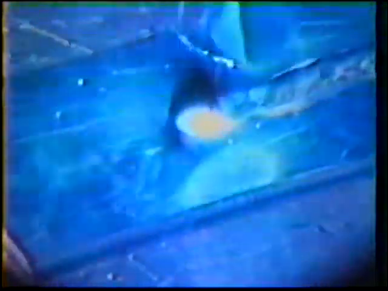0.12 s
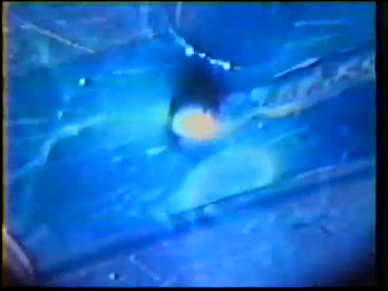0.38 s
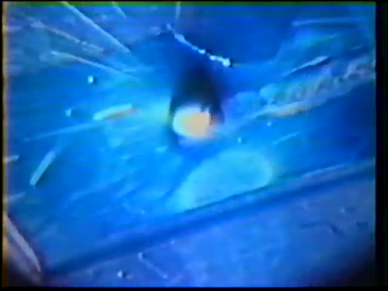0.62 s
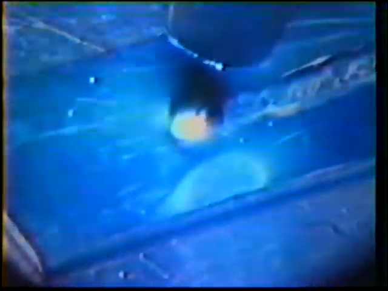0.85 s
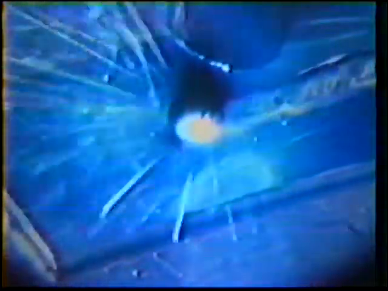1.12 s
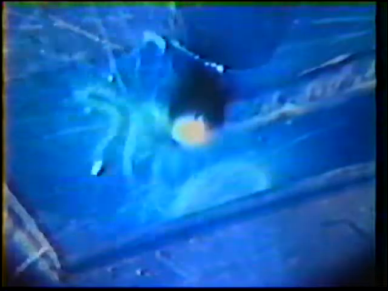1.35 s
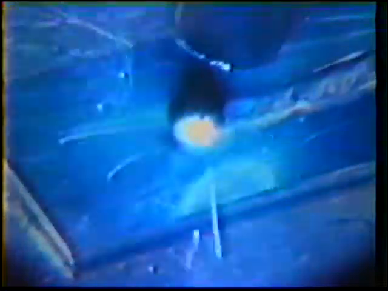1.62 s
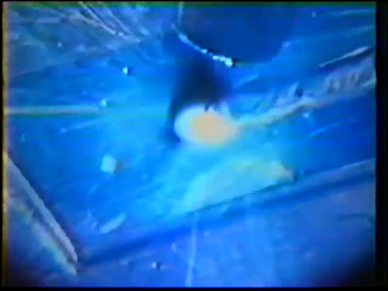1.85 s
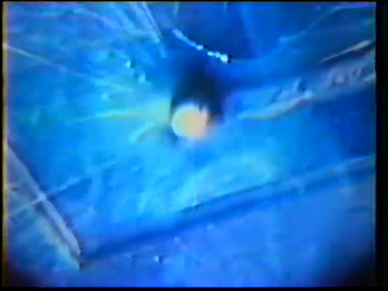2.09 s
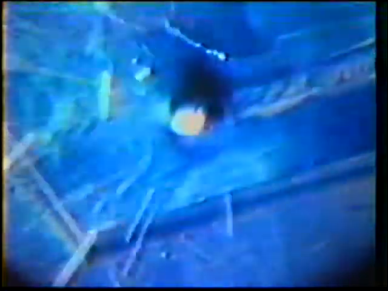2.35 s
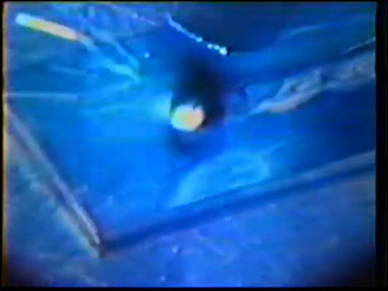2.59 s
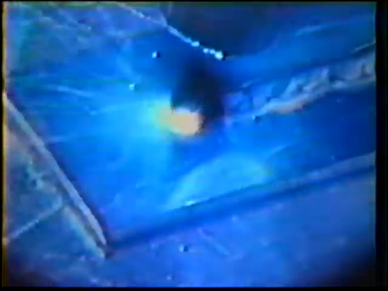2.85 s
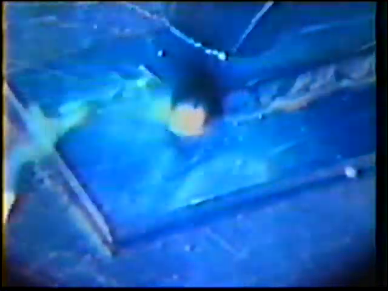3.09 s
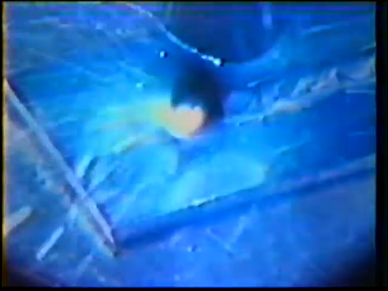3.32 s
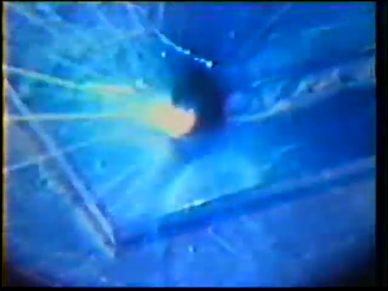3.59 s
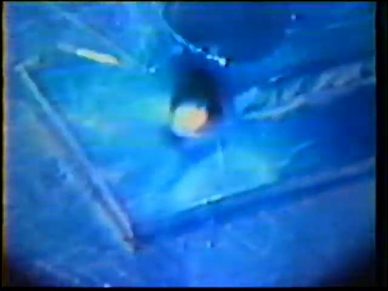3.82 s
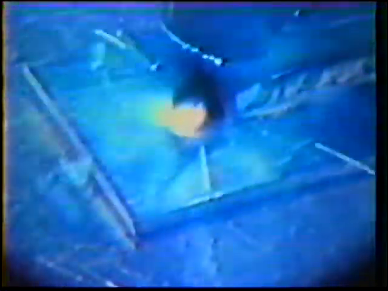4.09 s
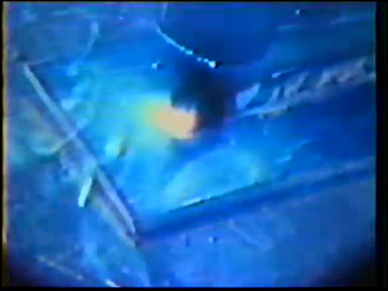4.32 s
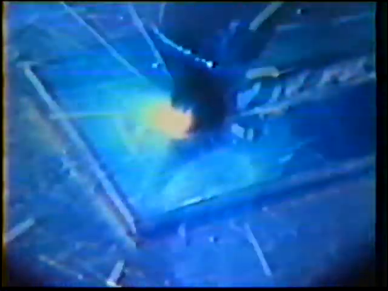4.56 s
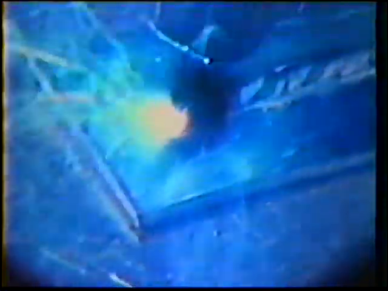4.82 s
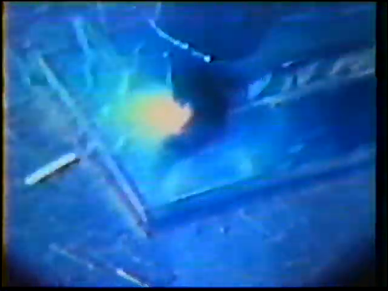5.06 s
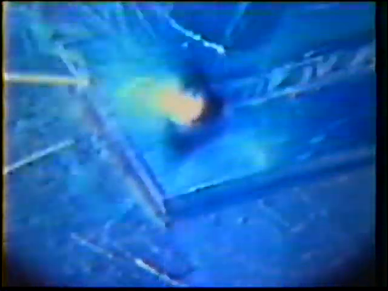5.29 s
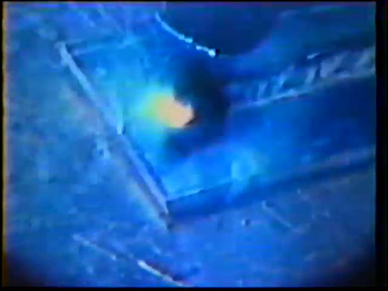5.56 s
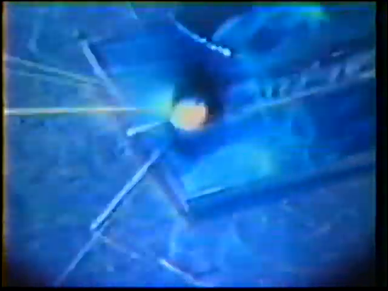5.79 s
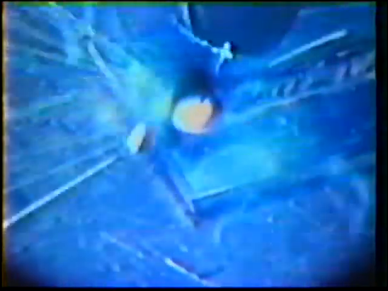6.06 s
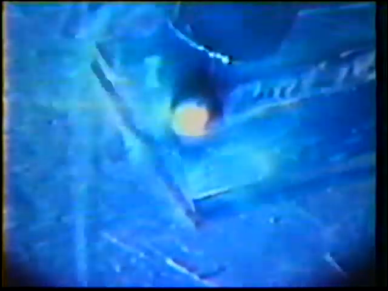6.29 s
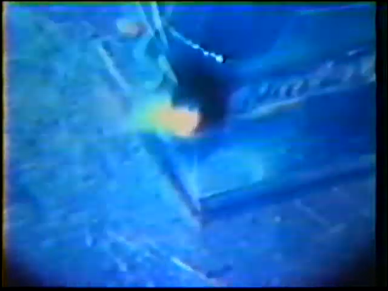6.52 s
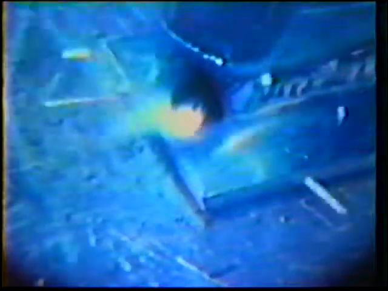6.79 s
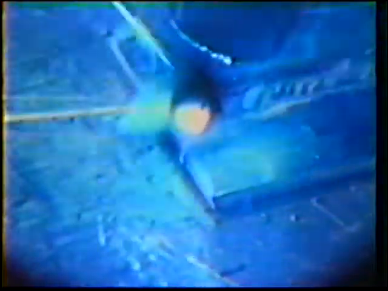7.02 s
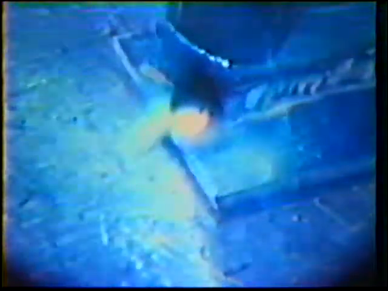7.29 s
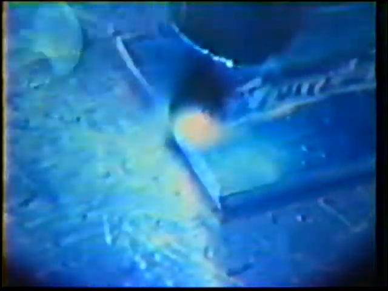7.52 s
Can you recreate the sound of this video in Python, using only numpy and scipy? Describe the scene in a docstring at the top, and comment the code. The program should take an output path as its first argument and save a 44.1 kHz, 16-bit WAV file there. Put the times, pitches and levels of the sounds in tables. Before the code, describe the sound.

From 0 s a welding arc is already burning on aluminium sheet, a loud, bright, frying hiss that flickers rapidly, ringing mostly in a metallic band around 3 to 6 kHz. Short-circuiting drops pop some forty times a second, slightly unevenly, with fine random crackle between them. Stronger snaps stand out near 0.45 s. From about 2.2 to 4.5 s the torch is close: the pops sound fuller and tiny beads tick more thickly on the sheet. It then draws back to a brighter sizzle, with a strong pop near 5.2 s. From 6.5 s the leaning torch changes the tone again. At about 7.4 s the arc starves, sputters and is out by 7.6 s, leaving a brief hard-room tail. Beneath throughout are a faint, steady motor hum near 354 Hz with its octave, low rumble and drones, and soft tape hiss. The close sound has slightly rounded peaks and little stereo width.

```python
"""A welding arc already burns on aluminium sheet in a hard-walled workshop, its noise ringing in nozzle and sheet.
Wire drops short and pop all along; from about 2.2 s to 4.5 s the torch works mostly close, and beads tick thicker.
The torch then draws back, leans over from 6.5 s, and at 7.4 s the trigger is let go: the arc starves and goes out.
A motor hum, rumble and drones lie beneath throughout.
One microphone feeds two slightly skewed tape tracks that round the peaks and hiss."""
import sys
import numpy as np
from scipy import signal
from scipy.fft import rfft, irfft, next_fast_len
from scipy.io import wavfile

SR = 44100
rng = np.random.default_rng(int(sys.argv[2]) if len(sys.argv) > 2 else 0)


def inscribe(sig):
    """Save sig as 16-bit PCM at rate SR to the path in sys.argv[1].

    A 1-D sig is mono; a 2-D sig holds one channel per row.
    Samples are clipped to [-1, 1] before scaling.
    """
    pcm = np.round(np.clip(np.atleast_2d(sig).T, -1, 1) * 32767)
    wavfile.write(sys.argv[1], SR, pcm.astype(np.int16))


def gain_from_db(level_db):
    """Turn a decibel level (scalar or array-like) into a linear amplitude factor."""
    decades = np.asarray(level_db, float) / 20
    return 10 ** decades


N = 337365


def rms_one(x):
    """Scale to rms 1."""
    return x / np.sqrt(np.mean(x ** 2) + 1e-20)


def in_time(rows):
    """Columns of a curve table, sample by sample."""
    s, *columns = np.transpose(rows)
    t = np.arange(N) / SR
    return [np.interp(t, s, column) for column in columns]


def at_hz(points, hz):
    """Columns of a spectrum table at the given frequency, on a log axis."""
    corner, *columns = np.transpose(points)
    return [np.interp(np.log(hz), np.log(corner), column) for column in columns]


def drift(rate_hz):
    """Slow chance of spread 1: noise through a double one-pole low-pass, run in for a second."""
    r = np.exp(-2 * np.pi * rate_hz / SR)
    noise = rng.standard_normal(N + SR)
    return rms_one(signal.lfilter([1], [1, -2 * r, r * r], noise)[SR:])


def resonate(x, hz, width_hz):
    """A resonance passed twice, so that the valleys beside it stay dark."""
    # each pass is wider, so that the pair has about the given width
    r = np.exp(-np.pi * 1.5 * width_hz / SR)
    gain = (1 - r * r) / 2
    section = [gain, 0, -gain, 1, -2 * r * np.cos(2 * np.pi * hz / SR), r * r]
    return signal.sosfilt([section, section], x)


def shaped(x, points):
    """Smooth colouring by a (hz, db) spectrum."""
    size = next_fast_len(N)
    hz = np.maximum(np.fft.rfftfreq(size, 1 / SR), 1)
    gain_db, = at_hz(points, hz)
    return irfft(rfft(x, size) * gain_from_db(gain_db), size)[..., :N]


def strikes_of(events):
    """One click per (start_s, strike_db) row."""
    start_s, strike_db = np.transpose(events)
    out = np.zeros(N)
    out[(start_s * SR).astype(int)] = gain_from_db(strike_db)
    return out


def puffs(strikes, decay_s, snap):
    """Each strike is a snap followed by a burst of noise that dies in a few milliseconds."""
    dying = signal.lfilter([1], [1, -np.exp(-1 / (decay_s * SR))], strikes + 1e-18)
    return dying * rng.standard_normal(N) + snap * strikes


# pose of the torch: start_s [s], closeness [0-1], lean [0-1]
TORCH_POSE = [(0, 0.55, 0.1), (.5, 0.03, 0.1), (1, 0, 0.2), (1.5, 0.37, 0.65), (2.05, 0.14, 0.77),
              (2.2, 0.88, 0.25), (2.8, 0.9, 0.25), (3.4, 0.91, 0.17), (4, 0.97, 0.13), (4.5, 0.52, 0),
              (5, 0.1, 0), (5.5, 0.02, 0.19), (6, 0, 0.35), (6.5, 0.14, 0.63), (7, 0.15, 0.96),
              (7.4, 0.34, 1), (7.65, 0.03, 0.5)]


def torch_pose():
    """How close and how leaning the torch is held, moving smoothly from pose to pose."""
    return in_time(TORCH_POSE)


# the trigger is let go: the arc starves, then goes out and leaves the cooling pool
STARVES_S, STARVES_DB_PER_S = 7.42, 79
OUT_S, OUT_DB_PER_S, EMBER_DB = 7.54, 300, -42
# strength of the sizzle as the hand travels, before the resonances: start_s [s], level_db [dB]
SIZZLE_LEVEL = [(0, -16.5), (.59, -14.5), (1.34, -15), (1.83, -17.5), (2.1, -16.5), (2.36, -16), (3, -18),
                (3.13, -16), (3.6, -17), (4.92, -15.5), (5.32, -14.5), (6.07, -15), (6.54, -17.5),
                (6.9, -18), (7.09, -14.5), (7.2, -18), (7.39, -21.5)]


def sizzle_db():
    """The travelling strength of the arc, starved and then put out at the end."""
    t = np.arange(N) / SR
    starving_db = STARVES_DB_PER_S * np.maximum(t - STARVES_S, 0)
    going_out_db = OUT_DB_PER_S * np.maximum(t - OUT_S, 0)
    level_db, = in_time(SIZZLE_LEVEL)
    return np.maximum(level_db - starving_db - going_out_db, EMBER_DB)


# further drops form at a fairly even pace, slower when the torch is close
DROP_EVERY_S, CLOSE_SLOWS_S, DROP_JITTER_S = .026, .007, .003
DROP_DB, DROP_SPREAD_DB = -23.5, 1.1
# drops shorting at set times, strong and weak: start_s [s], strike_db [dB before the resonances]
TIMED_DROPS = [(0.044, -17.5), (0.307, -25), (0.452, -15), (0.533, -22), (0.691, -17.5), (0.873, -23),
               (1.126, -30), (1.282, -21), (1.416, -25), (1.468, -23), (1.672, -24), (1.778, -25),
               (1.879, -21.5), (1.975, -24), (2.125, -22), (2.181, -18), (2.217, -23), (2.26, -18),
               (2.342, -20), (2.379, -23), (2.405, -20), (2.456, -21), (2.479, -20), (2.547, -18.5),
               (2.642, -19.5), (2.692, -25), (2.743, -17.5), (2.815, -20), (2.851, -20), (2.925, -19),
               (2.96, -20.5), (3.031, -21), (3.057, -18), (3.11, -20), (3.143, -18), (3.169, -20),
               (3.218, -18), (3.289, -19), (3.308, -17), (3.369, -20), (3.51, -26), (3.594, -22),
               (3.683, -21), (3.733, -19), (3.769, -17.5), (3.789, -19), (3.882, -22), (3.911, -22),
               (3.969, -20), (4.0, -19), (4.126, -23), (4.241, -24), (4.377, -18), (4.537, -23),
               (4.641, -22), (4.805, -19), (4.927, -18), (5.189, -13.5), (5.358, -21), (5.429, -19),
               (5.538, -21), (5.676, -24), (5.845, -23), (6.022, -20), (6.153, -22), (6.31, -22),
               (6.435, -18.5), (6.482, -22), (6.577, -22), (6.616, -19), (6.666, -22), (6.713, -23),
               (6.737, -22), (6.786, -20), (6.811, -18.5), (6.863, -22), (6.958, -22), (7.051, -21),
               (7.093, -18.5), (7.219, -19), (7.258, -20), (7.323, -19.5), (7.353, -20), (7.38, -23.5),
               (7.439, -21), (7.467, -33), (7.51, -31), (7.526, -26), (7.584, -33.5)]


def drops(close):
    """Drops at set times, with each wait between two shared evenly among further ones until the arc starves."""
    timed_s = np.transpose(TIMED_DROPS)[0]
    ends = timed_s[1:][timed_s[1:] < STARVES_S]
    even_s = []
    for start, end in zip(timed_s, ends):
        pace_s = DROP_EVERY_S + CLOSE_SLOWS_S * close[int(end * SR)]
        count = max(round((end - start) / pace_s), 1)
        even_s += list(np.linspace(start, end, count + 1)[1:-1])
    late, louder = rng.standard_normal((len(even_s), 2)).T
    further_s = np.array(even_s) + DROP_JITTER_S * late
    return list(TIMED_DROPS) + list(zip(further_s, DROP_DB + DROP_SPREAD_DB * louder))


SHORT_S, SHORT_DIP_DB = 0.0097, -2.5
LEAN_DIP_DB = -2   # the hiss sinks deeper when the torch leans


def burning_hiss(level, strikes, lean):
    """Noise that flickers with the arc length and sinks just before each pop, while a drop bridges the gap."""
    hiss = level * gain_from_db(1.43 * drift(38)) * rng.standard_normal(N)
    bridging = np.exp(-np.arange(SR // 20) / (SHORT_S * SR))
    # run backwards in time, so that the dip leads up to the strike
    reversed_strikes = 1. * (strikes[::-1] > 0)
    shorted = signal.fftconvolve(reversed_strikes, bridging)[:N][::-1]
    return hiss * gain_from_db((SHORT_DIP_DB + LEAN_DIP_DB * lean) * np.minimum(shorted, 1))


def sputter(level):
    """Small pops at random, about 150 a second, that follow the strength of the arc."""
    loudness_db = 3.5 * np.minimum(rng.exponential(1, N), 3)
    small = (rng.random(N) < 150 / SR) * gain_from_db(loudness_db)
    return level * rms_one(puffs(small, decay_s=0.0052, snap=3.2))


# resonances of nozzle, sheet and microphone: pitch_hz [Hz], width_hz [Hz], level_db [dB],
# close_db [dB more when close], lean_db [dB more when leaning]
RESONANCE_BANK = [(236, 160, -14.5, 1.5, 1.5), (443, 117, -8, 1.5, 3), (658, 300, -15.5, 2.5, 3.5),
                  (1014, 254, -14.5, 3.5, 3.5), (1386, 227, -7, 2, 0.5), (1647, 280, -10.5, 2, 3),
                  (2004, 710, -12.5, 1.5, -2.5), (2620, 370, -10, 2.5, 1), (3199, 236, 1, 5, -2),
                  (3608, 224, 1.5, 1, -3), (3830, 210, -1.5, 2.5, 1), (4057, 193, -0.5, 1, 0.5),
                  (4415, 200, -7, 0, -2), (4793, 224, -0.5, -1, 2.5), (5220, 206, 4.5, -3.5, -2),
                  (5403, 130, 3, -6, 2.5), (5563, 340, 1.5, 2, 0), (5924, 182, 6, -2.5, -1.5),
                  (6267, 210, -3.5, -3.5, 3.5), (6684, 336, -3, 3, 1.5), (6902, 575, -3.5, -4, 1.5),
                  (7890, 730, -14, 2.5, 3.5), (8415, 400, -9, -3, 4.5), (9240, 760, -11, -0.5, 3),
                  (10460, 590, -12.5, -2.5, 6), (11290, 780, -20, 1, 2), (12750, 1500, -24, -3, 1),
                  (13430, 260, -17.5, 0, 2.5), (14000, 410, -32, 1, 3)]
# how far pops stand out of the hiss: pitch_hz [Hz], pop_db [dB, drops], sputter_db [dB, small random pops]
POP_TINT = [(250, 15, -4), (600, 14.5, -5), (1390, 12, -5.5), (3400, 10, -7), (6000, -0.5, -8),
            (9000, 1, -9.5), (13000, -3, -12)]


def arc():
    """Hiss, small random pops and drop pops all ring the same resonances, rebalanced by the pose of the torch."""
    level = gain_from_db(sizzle_db())
    close, lean = torch_pose()
    small_pops = sputter(level)
    strikes = strikes_of(drops(close))
    pops = puffs(strikes, decay_s=0.0062, snap=6.4)
    hiss = burning_hiss(level, strikes, lean)
    out = 0
    for k, (hz, width_hz, db, close_db, lean_db) in enumerate(RESONANCE_BANK):
        pop_db, sputter_db = at_hz(POP_TINT, hz)
        source = hiss + gain_from_db(sputter_db) * small_pops + gain_from_db(pop_db) * pops
        gain = gain_from_db(db + close * close_db + lean * lean_db)
        # neighbouring resonances alternate in sign
        out = out + (-1) ** k * gain * resonate(source, hz, width_hz)
    return out


# further beads fall at random until the arc starves, mostly when the torch is close
BEADS_PER_S, CLOSE_BEADS_PER_S = 1.5, 5
BEAD_DB = -18.5
# beads hitting the sheet at set times: start_s [s], strike_db [dB before the band-pass]
TIMED_BEADS = [(0.0424, -19), (0.8594, -21), (1.6097, -17.5), (1.7774, -19), (2.1001, -20), (2.1304, -16.5),
               (2.2994, -17.5), (2.6694, -14), (2.9204, -17.5), (3.1194, -20), (3.7494, -14.5),
               (3.8794, -17.5), (4.425, -17.5), (4.784, -18), (5.4224, -19), (5.5974, -18), (6.5164, -18.5),
               (7.2594, -21), (7.3238, -14), (7.44, -18), (7.4884, -21.5), (7.529, -18), (7.5582, -28),
               (7.5864, -39)]


def spatter():
    """Molten beads tick on the sheet: very short bright bursts."""
    close, _ = torch_pose()
    burning = np.arange(N) < STARVES_S * SR
    chance = (BEADS_PER_S + CLOSE_BEADS_PER_S * close) / SR
    further = burning * (rng.random(N) < chance)
    ticks = puffs(strikes_of(TIMED_BEADS) + gain_from_db(BEAD_DB) * further, decay_s=0.004, snap=1.5)
    bright = signal.butter(3, [2300, 7500], "band", fs=SR, output="sos")
    return signal.sosfilt(bright, ticks)


def walls(x, t60_s=0.6):
    """A dense dying tail from the hard walls, starting 8 ms after the direct sound."""
    t = np.arange(SR // 2) / SR
    tail = rng.standard_normal(len(t)) * gain_from_db(-60 * t / t60_s) * (t > .008)
    return signal.fftconvolve(x, tail / np.sqrt(np.sum(tail ** 2)))[:N]


HUM_HZ = 354.1
# motor hum: start_s [s], fundamental_db [dB rms], octave_db [dB rms]
MOTOR_LEVEL = [(0, -40, -48.5), (.8, -38.5, -47.5), (1.8, -37, -48.5), (2.7, -40.5, -49.5), (4, -39, -48.5),
               (5.5, -39, -47), (6.8, -36.5, -49), (7.3, -37, -56), (7.65, -37, -49)]


def motor():
    """A clean tone and its octave, wavering a little in pitch."""
    first_db, octave_db = in_time(MOTOR_LEVEL)
    phase = 2 * np.pi * np.cumsum(HUM_HZ + 0.77 * drift(4.5)) / SR
    first = gain_from_db(first_db) * np.sin(phase)
    octave = gain_from_db(octave_db) * np.sin(2 * phase + 1)
    return np.sqrt(2) * (first + octave)


RUMBLE_DB = -49.5
# colour of the workshop rumble: pitch_hz [Hz], level_db [dB per Hz, relative]
RUMBLE_COLOUR = [(20, -5), (50, -5), (90, 6), (140, 0), (220, -1.5), (500, -9), (1500, -18), (6000, -11),
                 (15000, -42)]
# steady low tones of the shop: pitch_hz [Hz], level_db [dB rms before a slow waver]
SHOP_DRONES = [(72.1, -51.5), (120, -60.5), (180, -57.5)]


def workshop():
    """Lumpy broad rumble, as noise of wandering level, and a few drones of steady pitch."""
    rumble = rms_one(shaped(rng.standard_normal(N), RUMBLE_COLOUR))
    out = gain_from_db(RUMBLE_DB + 2.8 * drift(12.0)) * rumble
    t = np.arange(N) / SR
    for hz, db in SHOP_DRONES:
        out = out + np.sqrt(2) * gain_from_db(db + 1.6 * drift(2.2)) * np.sin(2 * np.pi * hz * t)
    return out


def scene():
    """One microphone hears the arc and spatter, their reverberation, the motor and the shop."""
    near = arc() + spatter()
    heard = near + gain_from_db(-10.0) * walls(near) + motor() + workshop()
    return np.tile(heard, (2, 1))


TAPE_CEILING, EMPHASIS = .15, .5   # ceiling of the lifted signal; zero of each lift stage


def saturate(x):
    """Treble is lifted before the tape rounds the peaks and lowered on playback, which dulls the distortion."""
    lift = np.convolve([1, -EMPHASIS], [1, -EMPHASIS]) / .45
    rounded = TAPE_CEILING * np.tanh(signal.lfilter(lift, [1], x) / TAPE_CEILING)
    return signal.lfilter([1], lift, rounded)


def skew_tracks(taped):
    """The right track lags a fraction of a sample."""
    size = next_fast_len(N)
    hz = np.fft.rfftfreq(size, 1 / SR)
    share = 0.49 + 0.5 / (1 + np.exp((hz - 11500) / 200))
    lag_s = 0.89 / SR * share
    turn = np.exp(-2j * np.pi * hz * lag_s * np.array([[-.5], [.5]]))
    return irfft(rfft(taped, size) * turn, size)[:, :N]


# blur that differs between the tracks: pitch_hz [Hz], level_db [dB against the common sound]
BLUR_COLOUR = [(30, -32), (120, -22), (400, -21.5), (1400, -17), (3000, -19.5), (7000, -13), (10500, -13),
               (14500, -1.5)]


def track_blur(taped):
    """Blur that follows the sound and differs between the tracks: the signal times low-passed noise."""
    low_pass = signal.butter(2, 700, fs=SR, output="sos")
    flutter = signal.sosfilt(low_pass, rng.standard_normal((2, N)))
    return shaped(taped * rms_one(flutter), BLUR_COLOUR)


TAPE_HISS_DB = -60
# colour of the tape hiss: pitch_hz [Hz], level_db [dB per Hz, relative]
HISS_COLOUR = [(100, -10), (3000, -6), (10000, 0), (15000, 2)]


def tape_hiss():
    """Coloured noise, drawn separately for each track."""
    return gain_from_db(TAPE_HISS_DB) * rms_one(shaped(rng.standard_normal((2, N)), HISS_COLOUR))


# constant offset of the two tracks: offset [full scale = 1]
OFFSETS = [
    [-.0506],
    [-.0332],
]


def top_cut(x):
    """Nothing passes above the cut-off."""
    return signal.sosfilt(signal.butter(12, 15100, fs=SR, output="sos"), x)


def record(dry):
    """Tape rounds peaks, skews the tracks, blurs and hisses on each; a steep low-pass ends the treble."""
    taped = saturate(dry)
    tracks = skew_tracks(taped) + track_blur(taped) + tape_hiss()
    low_pass = signal.ellip(12, .5, 70, 14500, fs=SR, output="sos")
    mix = signal.sosfilt(low_pass, tracks) + np.array(OFFSETS)
    return top_cut(mix)


dry = scene()
out = record(dry)
inscribe(out)
```